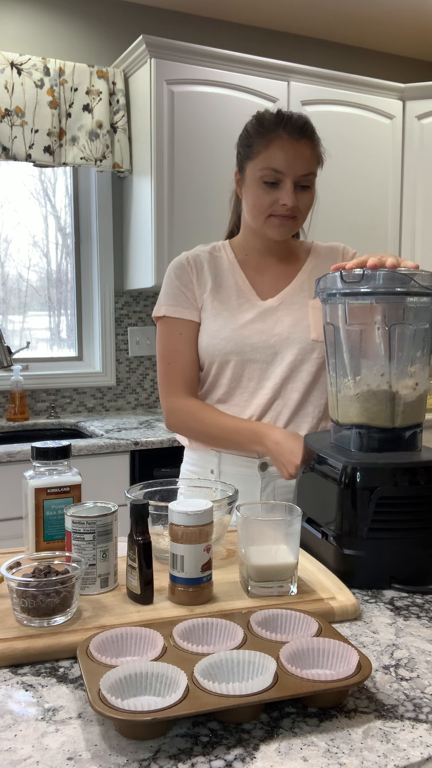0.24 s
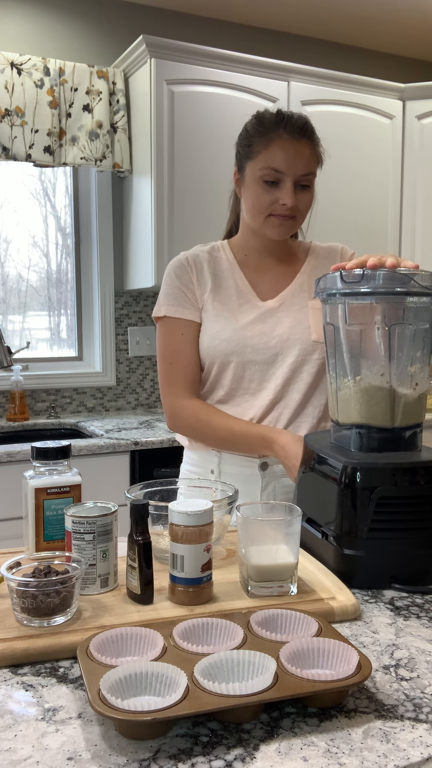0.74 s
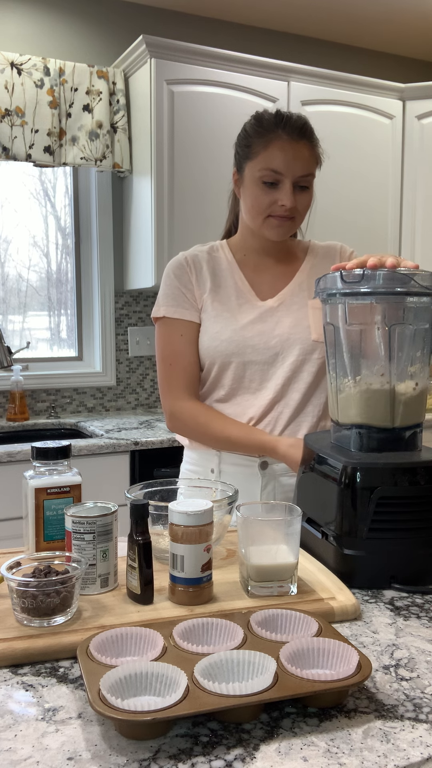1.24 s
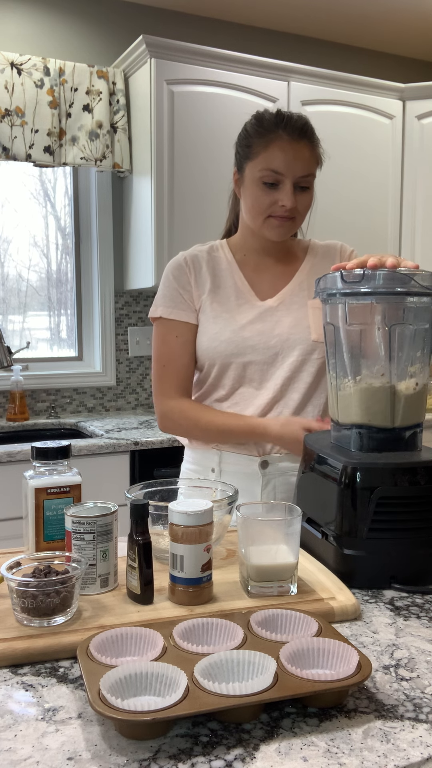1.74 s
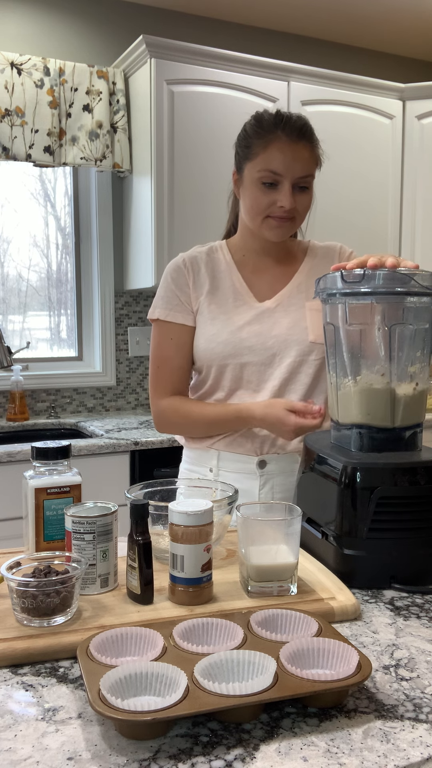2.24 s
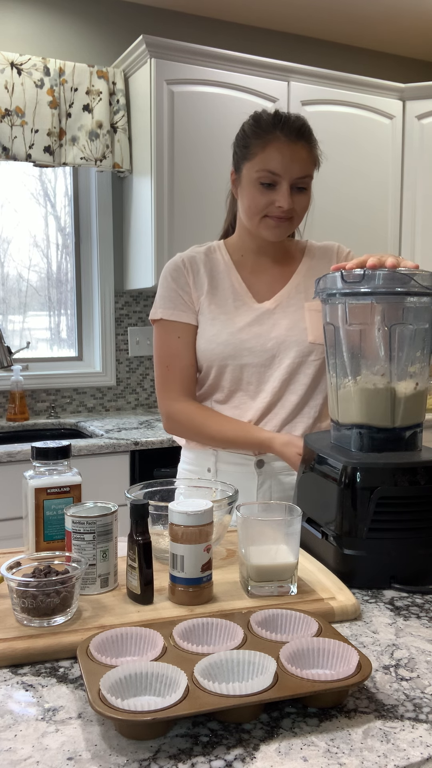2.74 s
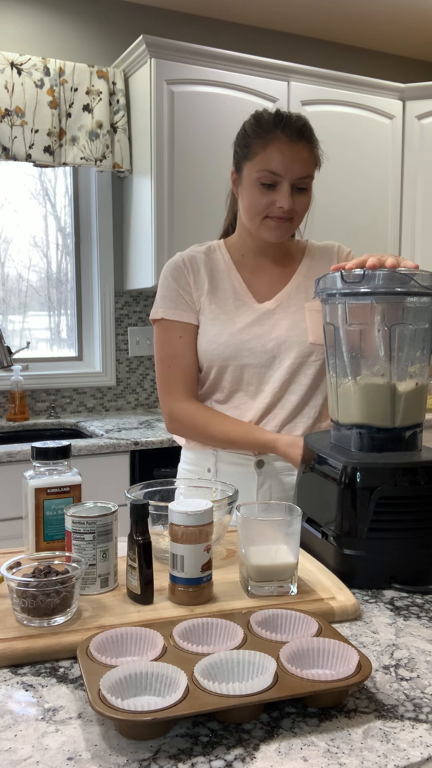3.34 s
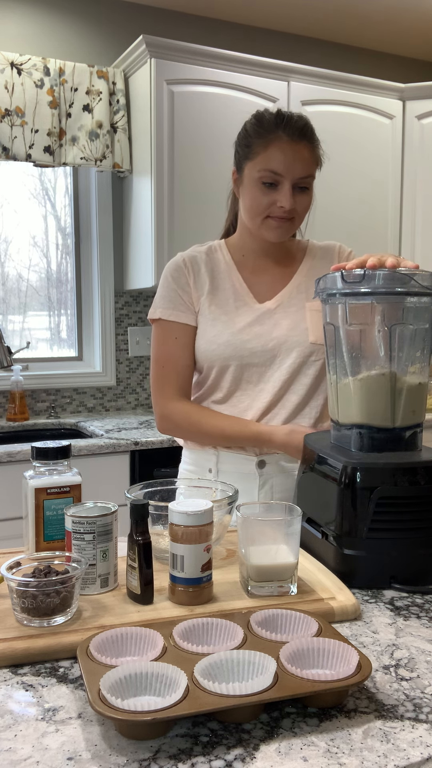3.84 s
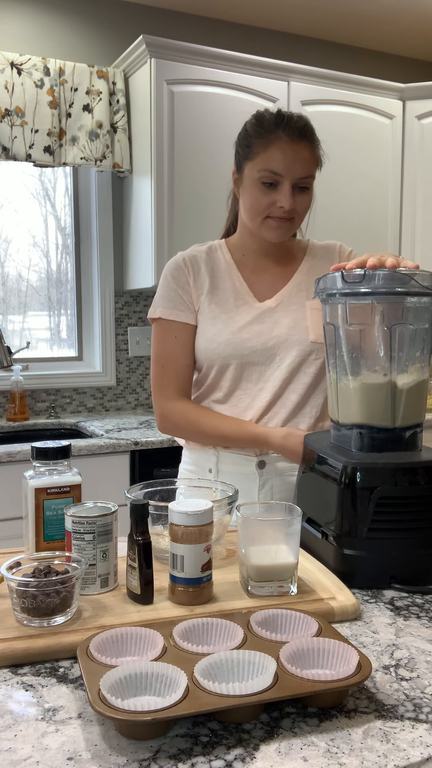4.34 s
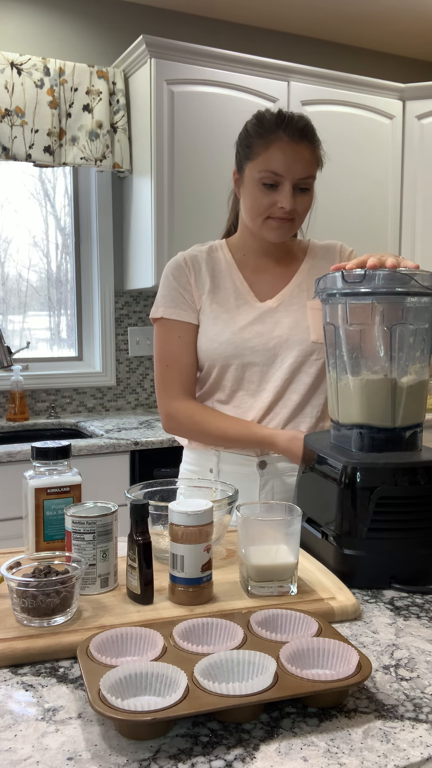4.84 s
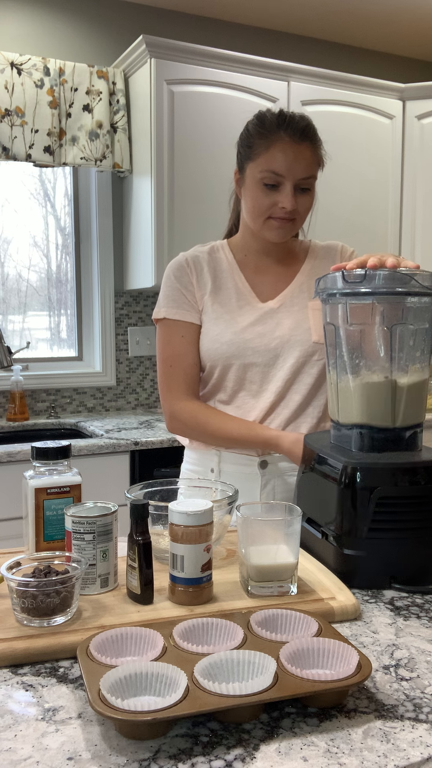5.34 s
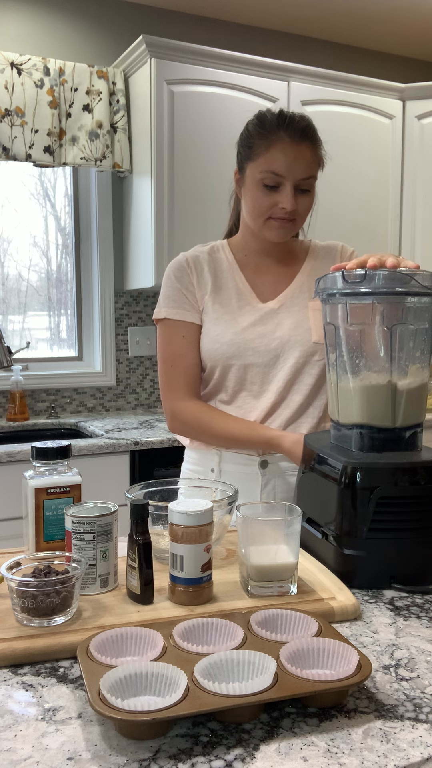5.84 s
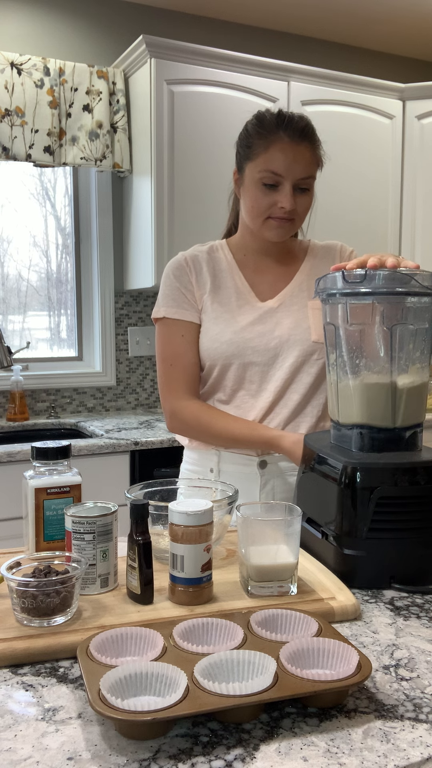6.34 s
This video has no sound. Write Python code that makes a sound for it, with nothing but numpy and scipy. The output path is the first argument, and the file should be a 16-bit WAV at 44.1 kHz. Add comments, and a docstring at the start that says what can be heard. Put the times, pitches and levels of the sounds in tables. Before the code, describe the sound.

A countertop blender runs very slowly at first, giving a low electric buzz and a soft slosh of thick batter over a faint room rumble. From about 1 second the motor speeds up and the churning grows louder, with several soft, dull knocks of lumps hitting the jug between 1.2 and 2 seconds. By 1.7 seconds it settles into a medium-speed hum with a thin whine and light hiss. The hum dips briefly just after 3 seconds. At about 3.4 seconds the motor sweeps quickly up to full speed, becoming clearly louder and higher. From 3.6 seconds until the end, at about 6.6 seconds, it holds a steady drone and whine, with rushing fan air and batter swirling continuously in the jug. The blender sounds fairly close and slightly to the right, with a short kitchen reverberation.

```python
"""A countertop blender works thick batter: the dial brings the motor up from a crawl, then a switch
throws it to full speed. Rotor unbalance and chopped mains current shake the base. Blades churn the
batter and throw lumps against the jug; brushes and cooling fan hiss over a low house rumble.
The sound arrives on the right just before the left; the kitchen adds a short diffuse tail."""
import sys
import numpy as np
from scipy import signal
from scipy.fft import rfft, irfft, next_fast_len
from scipy.io import wavfile

SR = 44100
rng = np.random.default_rng(int(sys.argv[2]) if len(sys.argv) > 2 else 0)


def transcribe(u):
    """Save the signal u as a 16-bit wav file named by the first command-line argument.

    u: samples, shape (n,) or (channels, n), limited to [-1, 1]; the rate is SR.
    q: integer samples, one column per channel.
    """
    v = np.clip(np.atleast_2d(u).T, -1, 1)
    q = np.round(v * 32767).astype(np.int16)
    wavfile.write(sys.argv[1], SR, q)


N = 291039
FFT_SIZE = next_fast_len(N + SR)
BIN_HZ = np.maximum(np.arange(FFT_SIZE // 2 + 1) * SR / FFT_SIZE, 1)
MID_SPEED_HZ, FULL_SPEED_HZ, MAINS_PULSE_HZ = 88.4, 163.7, 119.95

# rotor run-up: t/s, speed/Hz, once-a-turn level/dB
ROTOR_RUN = [(0, 40, -70), (0.95, 42, -68), (1.15, 55, -64), (1.45, 77, -60), (1.63, 88.5, -56),
             (1.75, 88.4, -45.5), (2.15, 88.3, -47.5), (2.3, 88.3, -43.5), (2.45, 88.3, -44),
             (2.68, 88.1, -50), (2.82, 88.2, -47), (3.05, 88.5, -48.5), (3.15, 86, -53), (3.3, 90, -58),
             (3.39, 122, -60), (3.44, 132, -43), (3.57, 159, -23), (3.64, 165, -23), (3.8, 164.7, -22),
             (4.1, 163.3, -22), (6.6, 163.5, -21.2)]
# twice-a-turn tone, loud at the base's resonance: t/s, level/dB
TWICE_A_TURN = [(1.3, -67), (1.45, -43), (1.61, -40), (1.66, -34.5), (2.18, -35), (2.27, -31), (2.42, -34),
                (2.7, -35), (3.02, -37), (3.08, -46), (3.2, -44), (3.33, -50), (3.42, -45), (3.48, -45),
                (3.6, -36), (6.6, -38.5)]
# whine lines: rotor order, mains pulse multiple, mid-speed level/dB, full-speed level/dB
WHINE_LINES = [(1, 1, -57, -43), (0, 1, -76, -67), (1, 2, -50, -46.5), (1.5, 0, -69, -49.5),
               (3, 0, -50, -36), (3, 1, -53.5, -40.5), (3.5, 0, -65, -36), (4, 0, -64, -33.5),
               (4, 1, -51, -40.5), (5, 0, -56, -38.5), (5, 1, -58, -44), (6, 0, -44.5, -44),
               (6.5, 0, -49, -68), (8, 0, -43.5, -63), (4.5, 0, -59, -39.5), (2.5, 0, -73, -54.5)]
# buzz lines: mains pulse multiple, level/dB
BUZZ_LINES = [(1, -13), (2, 4), (3, 4.5), (4, -3), (5, -4), (6, -6), (7, -7), (9, -10)]
# current chopping, deepest at low dial settings: t/s, even-line level/dB, odd-line level/dB
CHOP_LEVELS = [(0, -40.5, -40), (.4, -43, -40), (.63, -45, -40), (.7, -54, -44), (.95, -54, -40),
               (1.35, -46, -38), (1.7, -50, -45), (2.9, -70, -44), (3.35, -47, -41), (3.5, -48, -54),
               (4.1, -57, -63)]
# batter in motion: t/s, slosh level/dB, throat level/dB, spray level/dB
BATTER_LEVELS = [(0.0, -38.5, -41.5, -45.5), (0.45, -36, -41, -46), (0.9, -38.5, -42, -47),
                 (1.05, -36.5, -40.5, -43.5), (1.2, -31.5, -36, -42), (1.42, -29, -31.5, -40),
                 (1.6, -31.5, -30, -40), (1.9, -31, -30.5, -41), (2.3, -31, -30.5, -40.5),
                 (2.8, -32, -32.5, -42), (3.05, -34.5, -33.5, -43.5), (3.28, -30, -31.5, -39.5),
                 (3.45, -35.5, -28.5, -38.5), (3.54, -29, -27.5, -36), (3.64, -23.5, -25, -34),
                 (3.74, -29, -25, -37), (3.88, -27.5, -24, -32.5), (4.2, -29, -26, -36),
                 (4.6, -27.5, -25.5, -36), (5.05, -29, -25.5, -33.5), (5.5, -28, -25.5, -33.5),
                 (5.9, -28, -25.5, -35), (6.25, -27.5, -25, -35.5), (6.6, -30.5, -24.5, -35)]
# batter turbulence: f/Hz, level/dB
CHURN_SPECTRUM = [(25, -73), (36, -41), (55, -22), (105, -19), (200, -10.5), (320, -3), (500, 0),
                  (700, 0.5), (1000, -9.5), (1600, -11.5), (1850, -16), (2500, -12), (3300, -5),
                  (5000, -37), (9000, -26)]
# jug and room resonances: f/Hz, width/Hz, dial-speed gain/dB, full-speed gain/dB
JUG_ROOM_MODES = [(165, 25, 7.5, 1), (197, 12, -0.5, 6), (247, 17, 4.5, 9), (350, 18, -1.5, 5),
                  (428, 23, 5, -0.5), (510, 16, 2.5, 6.5), (551, 16, 2.5, 1.5), (581, 22, 2.5, 7),
                  (640, 27, 2.5, -4), (656, 37, -2, 1), (701, 29, 7, 4), (902, 17, 5.5, 2),
                  (963, 35, 0, 3.5), (1108, 45, 2, 2.5), (1190, 36, 4, 4.5), (1290, 130, 5.5, 3.5),
                  (1360, 97, 1.5, 3.5), (1468, 38, 8.5, 4.5), (1585, 28, 5, 2.5), (1652, 25, 7, 6),
                  (1825, 90, 10, 8), (1984, 50, 9.5, 9), (2192, 100, 8.5, 4), (2400, 66, 7.5, 4),
                  (2587, 140, 8, 2), (2730, 33, 6.5, 5.5)]
# housing resonances: f/Hz, width/Hz, gain/dB
HOUSING_MODES = [(3600, 120, 3), (4005, 100, 3), (4420, 80, 4), (4570, 70, 3), (4890, 60, 3),
                 (5450, 120, 2), (5710, 80, 3), (6290, 80, 4), (6610, 100, 4), (7430, 100, 3),
                 (7720, 110, 4), (8310, 100, 3), (11000, 300, 2)]
# brush hiss envelope: t/s, level/dB
BRUSH_LEVELS = [(0, -42.5), (.88, -43), (1.35, -34), (1.75, -33), (3.15, -35), (3.66, -28.5), (4.3, -30),
                (6.6, -29.5)]
# brushes on the commutator: f/Hz, level/dB
BRUSH_SPECTRUM = [(2000, -16), (3500, -9), (4400, -4), (5000, -3), (5600, 0), (6400, -1), (7100, -7),
                  (9300, -7.5), (10000, -9), (11000, -8), (12000, -12), (14000, -14), (15000, -16),
                  (16000, -19)]
# fan air: f/Hz, level/dB
FAN_SPECTRUM = [(1200, -20), (2200, -2), (3300, 0), (4400, -1), (5500, -7), (7000, -14), (12000, -22)]
# house and worktop rumble: f/Hz, level/dB
RUMBLE_SPECTRUM = [(20, -60), (36, -43), (52, 2.5), (68, -12), (88, -2), (110, -27), (160, 6.5), (300, -11),
                   (600, -29)]
# rumble swell: t/s, gain/dB
RUMBLE_SWELL = [(0, 0.5), (.9, -0.5), (1.3, 2), (1.9, -1.5), (6.6, 2)]
# lumps hitting the jug: t/s, level/dB
LUMP_HITS = [(1.205, -17), (1.274, -18), (1.39, -14), (1.475, -32), (1.545, -18), (1.601, -24),
             (1.696, -17), (1.995, -23)]
# diffuse level relative to direct sound, no wash near 4.4, 8.4 and 13 kHz: f/Hz, level/dB
DIFFUSE_SPECTRUM = [(60, -16), (170, -20), (300, -9), (800, 0), (1500, -2), (3100, -1), (3900, -16),
                    (4200, -34), (4700, -34), (5200, -11), (7300, -7), (7900, -34), (8800, -34), (9500, -8),
                    (11600, -8), (12200, -34), (13500, -34), (14200, -4)]
# right relative to left: f/Hz, level/dB
RIGHT_EXCESS = [(60, .5), (170, 1.2), (400, 2), (2500, 2), (4000, 0), (16000, 0)]
# left relative to right, negative = late: f/Hz, phase/half-cycles
LEFT_PHASE = [(0, 0), (1380, -.2), (1980, -.34), (2760, -.87), (3500, -.93), (4000, -1), (4800, -1),
              (7410, -1.78), (7750, -2), (8900, -2), (11600, -2.75), (11950, -3), (13600, -3),
              (15100, -3.55), (15500, -3.9)]


def amp(db):
    """Decibels to gain."""
    return 10 ** (np.asarray(db) / 20)


def unit_rms(x):
    """Scale to rms 1."""
    return x / np.sqrt(np.mean(x ** 2) + 1e-20)


def curves(rows):
    """Time table to one per-sample curve per column."""
    times_s, *columns = np.transpose(rows)
    return [np.interp(np.arange(N) / SR, times_s, column) for column in columns]


def spectrum_gain(points):
    """Gain per bin from (f/Hz, level/dB) points."""
    hz, db = np.transpose(points)
    return amp(np.interp(np.log(BIN_HZ), np.log(hz), db))


def mode_gain(modes):
    """Gain per bin from (f/Hz, width/Hz, gain/dB) resonances."""
    peaks = [1 + (amp(db) - 1) / (1 + (2 * (BIN_HZ - hz) / width_hz) ** 2) for hz, width_hz, db in modes]
    return np.prod(peaks, axis=0)


def filtered(x, gain):
    """Apply a gain per bin."""
    return irfft(rfft(x, FFT_SIZE) * gain, FFT_SIZE)[..., :N]


def wander(rate_hz):
    """Slow random drift, rms about 1: coarse noise through a two-pole low-pass."""
    hop, settle = 64, 1000
    pole = np.exp(-2 * np.pi * rate_hz * hop / SR)
    noise = rng.standard_normal(N // hop + settle + 2)
    drift = signal.lfilter([1], [1, -2 * pole, pole * pole], noise)[settle:]
    return np.interp(np.arange(N) / hop, np.arange(len(drift)), unit_rms(drift))


def tone(cycles, flutter_db, flutter_hz):
    """Sine with a wavering level."""
    sine = np.sqrt(2) * np.sin(2 * np.pi * (cycles + rng.random()))
    return sine * amp(flutter_db * wander(flutter_hz))


def path_noise(shared_power=0.15):
    """Partly correlated noise on three paths: direct, left wall, right wall."""
    noise = rng.standard_normal((3, N))
    noise[1:] = np.sqrt(shared_power) * noise[0] + np.sqrt(1 - shared_power) * noise[1:]
    return noise


def unbalance(turns, once_db):
    """Rotor unbalance shakes the base once and twice a turn."""
    twice_db, = curves(TWICE_A_TURN)
    once = tone(turns + 0.019 * wander(9.7), flutter_db=0.84, flutter_hz=12)
    twice = tone(2 * turns + 0.036 * wander(8), flutter_db=1.2, flutter_hz=15)
    return amp(once_db) * once + amp(twice_db) * twice


def whine(turns, mains_cycles, speed_oct):
    """Rotor orders and mains sidebands, fading below mid speed; batter drag jolts their phase."""
    mid_oct = np.log2(MID_SPEED_HZ / FULL_SPEED_HZ)
    out = 0
    for order, multiple, mid_db, full_db in WHINE_LINES:
        slip_cycles = 0.077 * np.sqrt(order) * wander(4.05)
        line = tone(order * turns + multiple * mains_cycles + slip_cycles, flutter_db=4.2, flutter_hz=15)
        level_db = np.interp(speed_oct, [mid_oct - 1, mid_oct, 0], [mid_db - 13, mid_db, full_db])
        out += amp(level_db) * line
    return out


def mains_buzz(mains_cycles):
    """The dial chops each mains half-wave; the windings buzz at multiples of that pulse."""
    parity_db = curves(CHOP_LEVELS)
    out = 0
    for multiple, db in BUZZ_LINES:
        line = tone(multiple * mains_cycles, flutter_db=1.3 * np.sqrt(multiple), flutter_hz=8)
        out += amp(db + parity_db[round(multiple) % 2]) * line
    return out


def churn(speed_oct, slosh_top_hz=950, throat_top_hz=1700, surge_db=1.36):
    """Turbulent batter drums on the jug: slosh low, the jug's throat above it, spray on top."""
    third_octaves = 3 * np.log2(BIN_HZ / slosh_top_hz)
    noise = path_noise()
    surging = 0
    for k in range(4):  # interleaved sets of third-octave bands, each set surging alone
        distance = np.abs((third_octaves - k + 2) % 4 - 2)
        comb = np.clip(1.5 - 2 * distance, 0, 1)
        surging += filtered(noise, comb) * amp(surge_db * wander(14.2))
    full_share = np.clip(1 + 2 * speed_oct, 0, 1)
    modes = np.array(JUG_ROOM_MODES)
    on_dial = rfft(surging * (1 - full_share), FFT_SIZE) * mode_gain(modes[:, :3])
    at_full = rfft(surging * full_share, FFT_SIZE) * mode_gain(modes[:, [0, 1, 3]])
    flow = spectrum_gain(CHURN_SPECTRUM) * (on_dial + at_full)
    below_slosh = 1 / (1 + (BIN_HZ / slosh_top_hz) ** 8)
    below_throat = 1 / (1 + (BIN_HZ / throat_top_hz) ** 8)
    bands = below_slosh, below_throat - below_slosh, 1 - below_throat
    parts = [unit_rms(irfft(flow * band, FFT_SIZE)[:, :N]) for band in bands]
    return sum(amp(db) * part for db, part in zip(curves(BATTER_LEVELS), parts))


def brush_hiss(turns, mains_cycles, resonances):
    """Brushes rub the commutator, pulsing once a turn and with the current."""
    level_db, = curves(BRUSH_LEVELS)
    pulsing = 1 + 0.024 * np.sin(2 * np.pi * turns) + 0.035 * np.sin(4 * np.pi * mains_cycles)
    sparks = path_noise() * pulsing * amp(0.45 * wander(12) + 0.35 * wander(4))
    return amp(level_db) * unit_rms(filtered(sparks, spectrum_gain(BRUSH_SPECTRUM) * resonances))


def fan_air(speed_oct, resonances, full_db=-31.5, db_per_oct=56):
    """Cooling air rushes through the housing, rising steeply with speed."""
    air = unit_rms(filtered(path_noise(), spectrum_gain(FAN_SPECTRUM) * resonances))
    return amp(full_db + db_per_oct * speed_oct) * air


def rumble(base_db=-48.5):
    """Low, slightly uneven noise of house and worktop."""
    swell_db, = curves(RUMBLE_SWELL)
    level_db = base_db + swell_db + 0.56 * wander(4.7)
    return amp(level_db) * unit_rms(filtered(path_noise(), spectrum_gain(RUMBLE_SPECTRUM)))


def lump_knocks(ring_hz=456, t60_s=0.036):
    """Each lump strikes the jug: one damped mode, a dull knock."""
    times_s, level_db = np.transpose(LUMP_HITS)
    impulses = np.full(N, 1e-18)
    impulses[(times_s * SR).astype(int)] = amp(level_db)
    radius, angle = amp(-60 / (t60_s * SR)), 2 * np.pi * ring_hz / SR
    return signal.lfilter([0.5, 0, -0.5], [1, -2 * radius * np.cos(angle), radius ** 2], impulses)


def kitchen(paths, decay_s=0.26):
    """Direct sound, later and softer on the left, plus a diffuse tail per side."""
    t = np.arange(SR // 2) / SR
    tail = rng.standard_normal((2, len(t))) * amp(-60 * t / decay_s) * (t > 0.004)
    diffuse = rfft(tail, FFT_SIZE)
    diffuse /= np.sqrt(np.abs(diffuse) + 1e-12)  # clutter scatters: no single pitch rings out
    diffuse /= np.sqrt(np.mean(np.abs(diffuse) ** 2, axis=1, keepdims=True))
    wet = spectrum_gain(DIFFUSE_SPECTRUM)
    right_gain = np.sqrt(spectrum_gain(RIGHT_EXCESS))
    balance = np.array([1 / right_gain, right_gain]) / np.sqrt(1 + wet ** 2)
    left_rad = np.pi * np.interp(BIN_HZ, *np.transpose(LEFT_PHASE))
    direct = filtered(paths[0], balance * [np.exp(1j * left_rad), np.ones(len(BIN_HZ))])
    return direct + filtered(paths[1:], balance * wet * diffuse)


def scene():
    """Blender and rumble, heard across the kitchen."""
    set_hz, once_db = curves(ROTOR_RUN)
    speed_oct = np.log2(set_hz / FULL_SPEED_HZ)
    drag_hz = 0.6 * set_hz / FULL_SPEED_HZ * wander(3)  # batter pulls the rotor off its set speed
    turns = np.cumsum(set_hz + drag_hz) / SR
    mains_cycles = MAINS_PULSE_HZ * np.arange(N) / SR
    resonances = mode_gain(HOUSING_MODES) * mode_gain(np.array(JUG_ROOM_MODES)[:, [0, 1, 3]])
    tones = unbalance(turns, once_db) + whine(turns, mains_cycles, speed_oct) + mains_buzz(mains_cycles)
    paths = tones * amp([[0], [-10], [-10]])  # mostly direct, along the worktop
    paths += churn(speed_oct)
    paths += brush_hiss(turns, mains_cycles, resonances)
    paths += fan_air(speed_oct, resonances)
    paths += rumble()
    paths += lump_knocks() * amp([[0], [-8], [-8]])
    return kitchen(paths)


def record(dry):
    """Steep low-pass at 15.7 kHz."""
    return signal.sosfilt(signal.ellip(12, 0.5, 80, 15700, fs=SR, output="sos"), dry)


dry = scene()
out = record(dry)
transcribe(out)
```